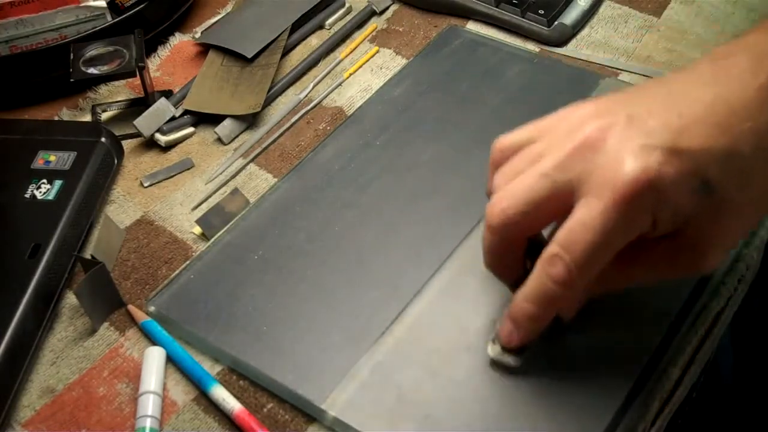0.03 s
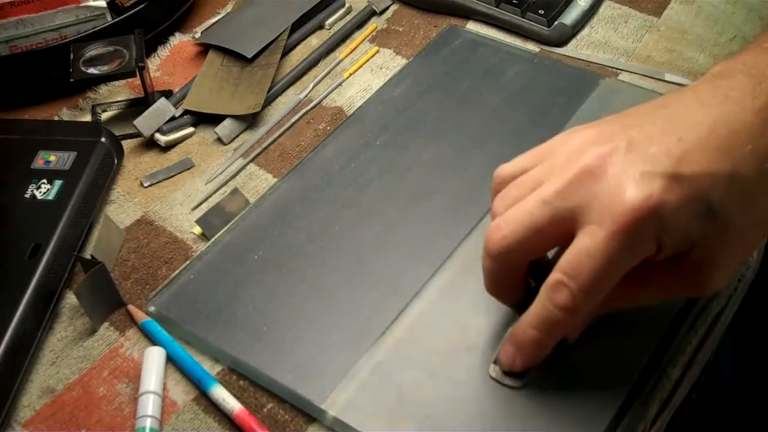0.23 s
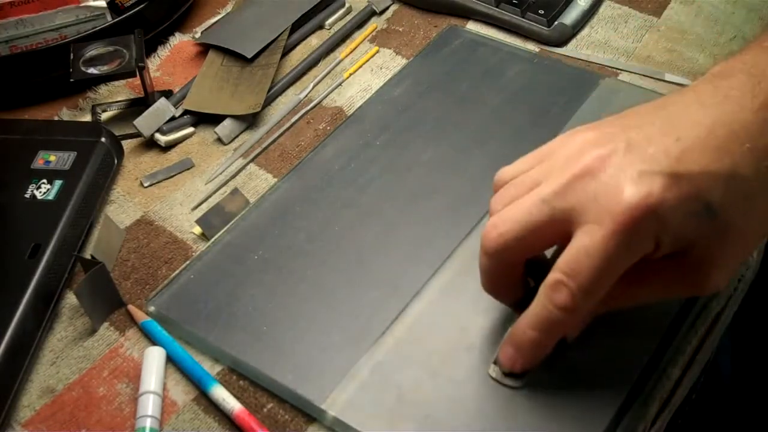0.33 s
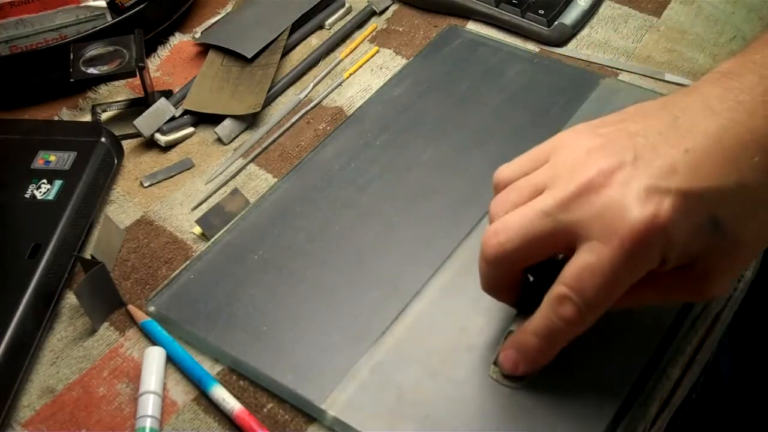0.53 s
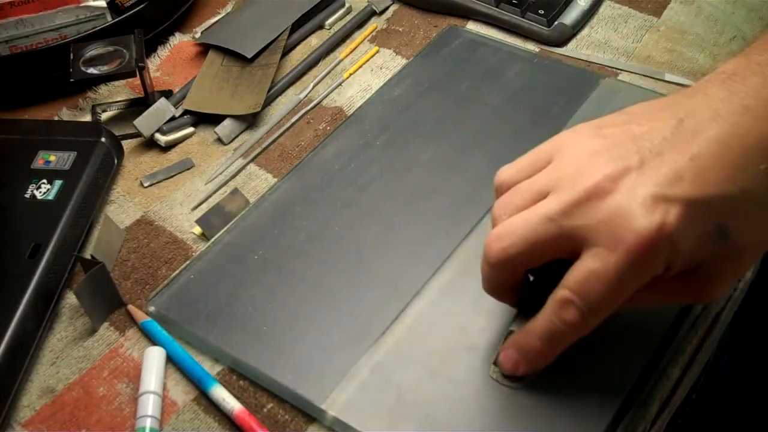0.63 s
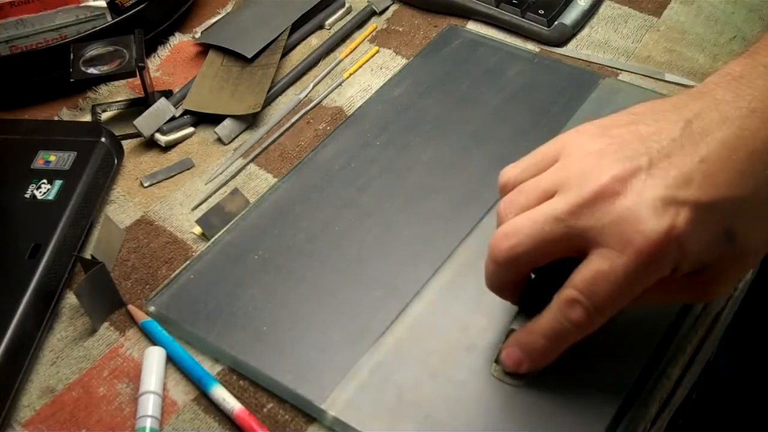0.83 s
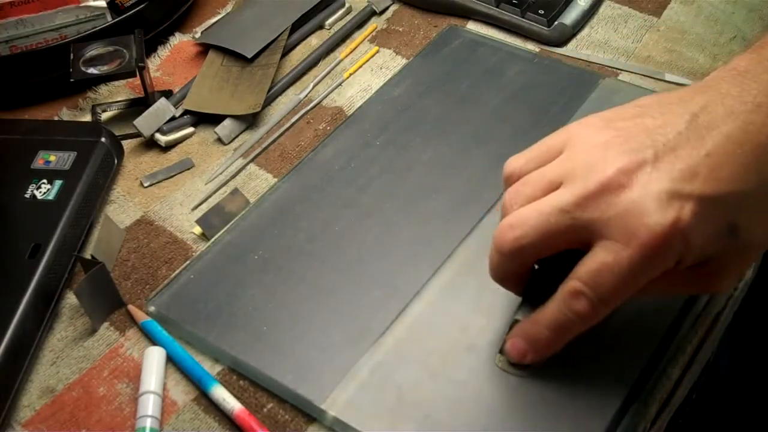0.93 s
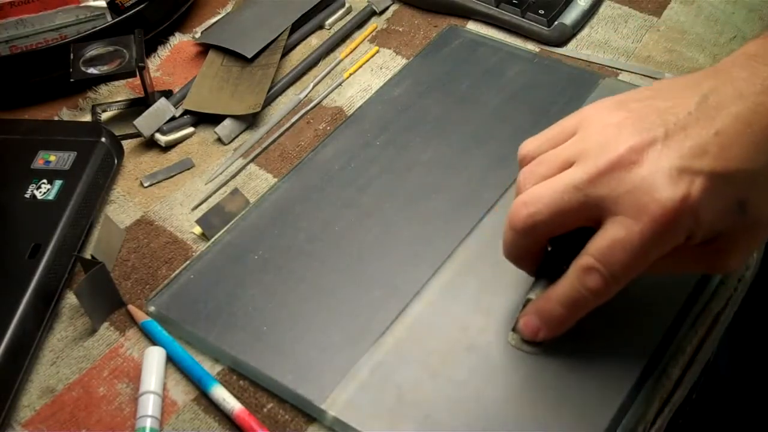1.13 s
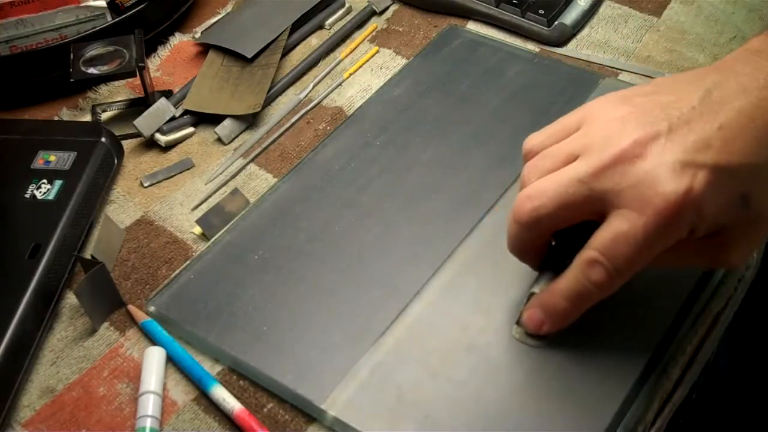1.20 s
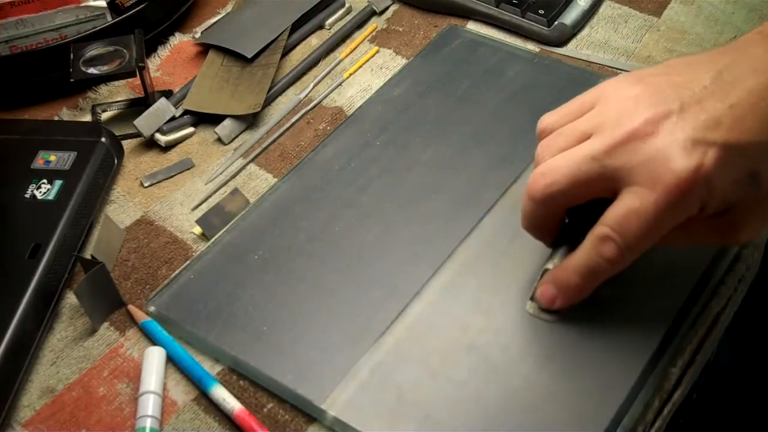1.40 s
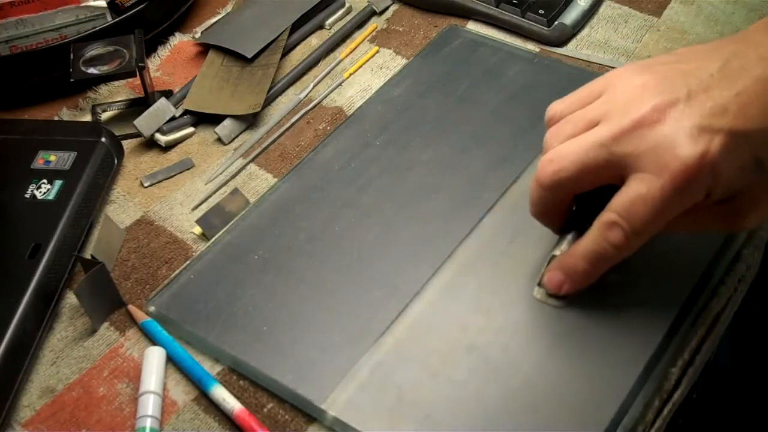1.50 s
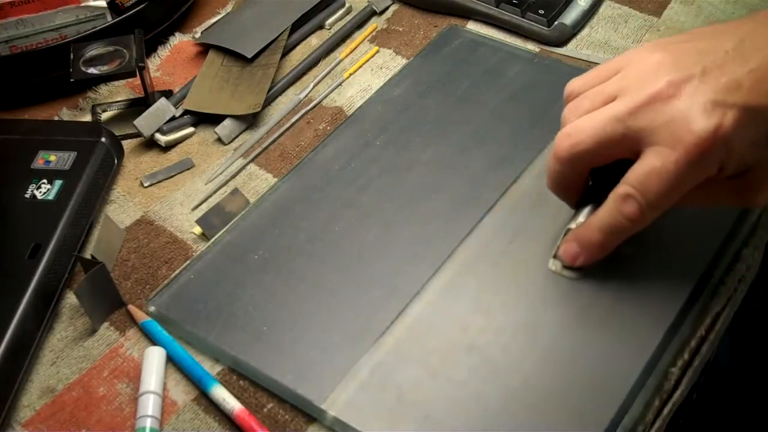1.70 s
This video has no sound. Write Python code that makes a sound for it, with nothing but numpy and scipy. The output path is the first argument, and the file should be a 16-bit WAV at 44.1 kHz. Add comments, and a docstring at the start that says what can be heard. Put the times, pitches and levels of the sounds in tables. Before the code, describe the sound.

Metal mouthpiece rubbing on sandpaper over a glass plate, after one sharp ringing click.

```python
"""A metal mouthpiece clicks down sharply on sandpaper laid over a glass plate, is nudged twice, then rubs slowly
across the grit. The click rings decaying plate and metal modes with a noise crack; the nudges are dull damped knocks.
The rub is grains and noise driving rim, plate and treble resonances. Behind it, a quiet workshop:
shaped noise for air and hiss, drifting sines for machine hum, and mains harmonics buzzing mostly on the left."""
import sys
import numpy as np
from scipy import signal
from scipy.fft import rfft, irfft, next_fast_len
from scipy.io import wavfile
from scipy.ndimage import map_coordinates

SR = 44100
rng = np.random.default_rng(int(sys.argv[2]) if len(sys.argv) > 2 else 0)


def master_out(mix):
    """Clip the mix to full scale and print it as 16-bit PCM to the path in sys.argv[1]."""
    frames = np.transpose(np.atleast_2d(mix))
    ceiling = np.clip(frames, -1, 1)
    pcm = np.round(ceiling * 32767).astype(np.int16)
    wavfile.write(sys.argv[1], SR, pcm)


def volts_from_decibels(level):
    """Turn decibel levels (scalar or array-like) into linear amplitude factors."""
    exponent = np.asarray(level, float) / 20
    return 10 ** exponent


N = 77175


def unit(x):
    """Scale to rms 1."""
    return x / np.sqrt(np.mean(x ** 2) + 1e-20)


def along(points, hz):
    """Read a curve of (f/Hz, value) points on a log frequency axis."""
    f, v = np.transpose(points)
    return np.interp(np.log(hz + 1), np.log(f + 1), v)


def sides(pan_db):
    """Left and right gains that differ by pan_db."""
    return volts_from_decibels(np.array([pan_db / 2, -pan_db / 2]))


def wobble(rate):
    """A smooth random curve with rate knots a second."""
    return map_coordinates(rng.standard_normal(int(N * rate / SR) + 4), [np.arange(N) * rate / SR])


def filtered(x, response):
    """Shape x by a complex response of frequency."""
    m = next_fast_len(N + SR // 2)
    return irfft(rfft(x, m) * response(np.fft.rfftfreq(m, 1 / SR)), m)[..., :N]


def peak(f, hz, width_hz):
    """A causal resonance of gain 1 at its centre."""
    return 1j * f * width_hz / (hz * hz - f * f + 1j * f * width_hz)


def pair(a, b, alike):
    """Left and right of a given likeness, mixed from two unrelated signals."""
    turn = np.arccos(np.clip(alike, -1, 1)) / 2
    mid, side = np.cos(turn) * a, np.sin(turn) * b
    return np.array([mid + side, mid - side])


# spectrum of the air and hiss: f/Hz, relative level/dB (density)
AIR_SPECTRUM = [(12, -45), (22, -11), (60, -12), (140, -14), (250, -11.5), (570, -12), (900, -13.5),
                (1400, -14.5), (1900, -17.5), (4000, -19), (7900, -19.5), (10000, -25.5), (14000, -23.5),
                (15000, -68)]
# stereo likeness of the air: f/Hz, left-right likeness (-1 to 1)
AIR_LIKENESS = [(60, -0.19), (180, 0.38), (540, 0.57), (1630, 0.053), (4890, -0.08), (14700, 0.01)]
# stereo balance of the air: f/Hz, left minus right level/dB
AIR_BALANCE = [(60, 3), (180, 3.3), (540, 4.7), (1630, 5.3), (4890, 2.7), (14700, 1.6)]


def room_air():
    """Room air and microphone hiss: stereo noise shaped in spectrum, likeness and balance, at rms 1."""
    m = next_fast_len(N)
    hz = np.fft.rfftfreq(m, 1 / SR)
    a, b = rfft(rng.standard_normal((2, m)))
    spectrum = pair(a, b, along(AIR_LIKENESS, hz)) * volts_from_decibels(along(AIR_SPECTRUM, hz))
    return unit(irfft(spectrum * sides(along(AIR_BALANCE, hz)), m)[:, :N])


# machine tones: f/Hz, relative level/dB
HUM_TONES = [(120, -83), (180, -70.5), (240, -74.5), (538.5, -82.5), (834.4, -86), (1349, -73.5),
             (1408, -72.5)]


def machine_hum():
    """Steady machine tones, each a sine of gently drifting level."""
    t = np.arange(N) / SR
    hum = 0
    for hz, db in HUM_TONES:
        level = volts_from_decibels(db + 4 + 0.5 * wobble(7.9))  # the whole hum sits 4 dB over its table
        hum = hum + level * np.sin(2 * np.pi * (hz * t + rng.random()))
    return hum * sides(0.99)[:, None]


# envelope over the buzz harmonics: f/Hz, relative level/dB of each harmonic
BUZZ_ENVELOPE = [(6500, -100), (7100, -79), (7600, -85), (8100, -78), (8800, -82), (9200, -100)]


def mains_buzz():
    """High mains harmonics at random phases and uneven levels, far stronger on the left."""
    mains_hz, spread_db, left_db, right_db = 60.02, 3, 3, -15
    t = np.arange(N) / SR
    lines_hz = mains_hz * np.arange(108, 154)
    levels = volts_from_decibels(along(BUZZ_ENVELOPE, lines_hz) + rng.normal(0, spread_db, len(lines_hz)))
    phases = rng.random((len(lines_hz), 1))
    buzz = levels @ np.sin(2 * np.pi * (lines_hz[:, None] * t + phases))
    return buzz * volts_from_decibels([[left_db], [right_db]])


def workshop():
    """The quiet workshop bed: air whose level drifts slowly, plus hum and buzz."""
    air, hum, buzz = room_air(), machine_hum(), mains_buzz()
    air_db = -58 + 1.24 * wobble(5.05)
    return volts_from_decibels(air_db) * air + hum + buzz


def grit():
    """Dense grains of uneven size on a bed of noise."""
    grains_per_s, spread_db, grains_over_noise_db = 3000, 1.8, -3
    hits = rng.random(N) < grains_per_s / SR
    grains = hits * rng.standard_normal(N) * volts_from_decibels(spread_db * rng.exponential(size=N))
    return unit(rng.standard_normal(N) + volts_from_decibels(grains_over_noise_db) * unit(grains))


def rubbed(modes, force, damping):
    """Grit force driven through modes, each swelling at random as the contact moves; damping widens them."""
    drift_db = 2.5
    ring = 0
    for k, (hz, t60, _, db, pan) in enumerate(modes):
        width_hz = 3 * np.log(10) / np.pi / max(t60, .005) * damping
        swell = volts_from_decibels(db + drift_db * wobble(11.64))
        mode = filtered(force, lambda f: peak(f, hz, width_hz))
        ring = ring + (-1) ** k * swell * sides(pan)[:, None] * mode  # neighbours in opposite sign
    return unit(ring)


# rim resonances, the lower band then the upper: f/Hz, width/Hz
RIM_BANDS = [
    [(5520, 260), (5690, 320)],
    [(5930, 320), (6110, 260)],
]


def rubbed_rim(a, b, levels_db):
    """Grit hisses through two broad bands of rim resonance, each on its own level curve."""
    force = pair(a, b, 0.78)
    rim = 0
    for db, band in zip(levels_db, RIM_BANDS):
        hiss = filtered(force, lambda f: sum(peak(f, hz, width) ** 2 for hz, width in band))
        rim = rim + volts_from_decibels(db) * unit(hiss)
    return rim * sides(-3)[:, None]


# glass plate modes: f/Hz, free t60/s, struck level/dB, rubbed level/dB, left minus right level/dB
PLATE_MODES = [(86, .15, -42, -43.5, 2), (282, 0.11, -38.5, -28, -3), (385.3, 0.18, -27.5, -14.5, 2.5),
               (463, 0.28, -36.5, -16.5, -0.5), (537, 0.15, -27, -35, 0), (670, 0.17, -30, -27, 1.5),
               (825, 0.05, -27, -33, -2), (993, 0.14, -34.5, -46, -35), (1170, 0.11, -23, -23.5, -1),
               (1356, 0.073, -16.5, -20, 1), (1585, 0.031, -5.5, -33, -4), (1875, 0.033, 5, -12.5, 4),
               (1937, 0.064, -30, -11, 3.5), (2354, 0.053, 1.5, -6, -0.5), (2761, 0.052, 1.5, -17, 2.5),
               (3184, 0.07, -1.5, -9.5, -5), (3500, 0.061, -7.5, -14.5, 13.5),
               (3683, 0.03, -0.5, -13.5, 2.5), (3943, 0.061, -2.5, -4, 1), (4390, 0.027, -4.5, -21, 10),
               (4720, 0.045, -5.5, -22.5, -11), (5575, 0.077, -5.5, -24, 1), (5700, 0.055, -24, -22, 3),
               (5760, 0.24, -44.5, -17.5, -52)]
# hiss of the rubbed plate: f/Hz, relative level/dB
PLATE_HISS_CURVE = [(300, -23), (700, 2), (1500, 8), (3000, 6), (5000, 2), (7000, -54)]


def rubbed_plate(b, c):
    """Grit rings the glass modes, with a shaped hiss under the ring."""
    hiss = unit(filtered(pair(c, b, 0.92), lambda f: volts_from_decibels(along(PLATE_HISS_CURVE, f))))
    return unit(rubbed(PLATE_MODES, c, 0.57) + volts_from_decibels(-6.5) * hiss)


# mouthpiece modes: f/Hz, free t60/s, struck level/dB, rubbed level/dB, left minus right level/dB
METAL_MODES = [(7180, 0.13, -17, -64, 22.5), (7400, 0.29, -20, -12, 25), (7480, 0.58, -17.5, -18, 20),
               (8000, 0.17, -16.5, -19, 2.5), (8900, 0.19, -56, -27, -38), (9100, 0.12, -61, -20, 20),
               (9900, 0.093, -67, -26.5, 36)]
# treble fizz: f/Hz, relative level/dB
FIZZ_CURVE = [(3880, -37), (6600, -4), (6930, 3), (8300, 7), (8940, -4), (9990, -6), (11200, -18),
              (13000, -11)]


def rubbed_treble(a):
    """Wide grit fizz leaning left, plus the mouthpiece's modes shortened by the hand that holds it."""
    held_damping = 9  # held metal rings this many times shorter
    fizz = unit(filtered(pair(grit(), grit(), 0.1), lambda f: volts_from_decibels(along(FIZZ_CURVE, f))))
    metal = rubbed(METAL_MODES, a, held_damping)
    return unit(fizz * sides(14.5)[:, None] + volts_from_decibels(2.5) * metal)


# rubbing levels, before judder and pan:
# t/s, lower rim level/dB, upper rim level/dB, plate level/dB, treble level/dB
RUB_LEVELS = [(0, -61, -60, -71, -60.5), (.044, -73, -87, -82, -69), (.12, -82, -95, -102, -95),
              (.215, -97, -100, -99.5, -97), (.23, -62, -57, -46, -73), (.255, -61, -69, -56, -65),
              (.285, -59, -58, -54, -69), (.31, -97, -100, -99, -95.5), (.45, -82, -82, -89, -95),
              (.475, -67.5, -61, -66.5, -79), (.51, -73, -95, -105, -93), (.9, -107.5, -97.5, -95, -97.5),
              (0.925, -90, -79, -68, -78), (0.935, -74, -68, -86, -73), (0.953, -58, -53.5, -56.5, -59.5),
              (0.977, -54, -60, -61, -62.5), (0.991, -49.5, -52, -58.5, -54),
              (1.015, -47.5, -53, -54, -49.5), (1.081, -51.5, -54, -55.5, -57.5),
              (1.095, -49, -62, -61, -54), (1.102, -69, -41, -53, -59), (1.116, -47, -46.5, -48.5, -52),
              (1.13, -43, -45.5, -52, -51), (1.148, -46.5, -57, -52, -49), (1.184, -46, -51, -52, -52),
              (1.2, -53, -50, -54, -55), (1.22, -51, -41.5, -48, -44), (1.29, -47.5, -49, -51, -52),
              (1.3, -48, -46.5, -47.5, -48), (1.315, -60, -41.5, -50, -51), (1.323, -45, -44, -47, -44),
              (1.337, -49, -40.5, -50, -50), (1.381, -47, -42.5, -50.5, -50), (1.393, -46.5, -59, -51, -50),
              (1.507, -45, -63, -52.5, -50), (1.533, -48, -50, -51, -53), (1.543, -45.5, -57, -51, -48.5),
              (1.563, -44.5, -62, -51.5, -49.5), (1.571, -47, -57, -51, -51), (1.597, -51, -48, -51.5, -51),
              (1.619, -40, -45, -52.5, -48), (1.711, -45.5, -46, -53, -50), (1.75, -48, -49, -54, -50.5)]


def rubbing():
    """Shared grit drives rim, plate and treble along their level curves, with one judder over all."""
    times, *columns = np.transpose(RUB_LEVELS)
    t = np.arange(N) / SR
    *rim_db, plate_db, treble_db = (np.interp(t, times, column) for column in columns)
    judder_db = 0.7 * (wobble(24.8) + wobble(90))
    a, b, c = grit(), grit(), grit()
    rim = rubbed_rim(a, b, rim_db)
    plate = volts_from_decibels(plate_db) * rubbed_plate(b, c)
    treble = volts_from_decibels(treble_db) * rubbed_treble(a)
    return volts_from_decibels(judder_db) * (rim + plate + treble)


# room decay: f/Hz, t60/s
ROOM_DECAY = [(300, 0.626), (2000, .25), (8000, 0.15)]
# stereo likeness of the room tail: f/Hz, left-right likeness
ROOM_LIKENESS = [(300, 0.98), (1000, 0.43), (4000, 0.13)]


def room(x):
    """Diffuse tail after a 300-sample delay: stereo noise in which each frequency dies at its own speed."""
    hz, t, z = signal.stft(rng.standard_normal((2, SR // 2)), SR, nperseg=256)
    decay = volts_from_decibels(-60 * t / along(ROOM_DECAY, hz)[:, None])
    diffuse = pair(*z, along(ROOM_LIKENESS, hz)[:, None])
    tail = signal.istft(diffuse * decay, SR, nperseg=256)[1]
    tail = tail / np.linalg.norm(tail[0])
    delayed = np.pad(x.mean(0), (300, 0))
    return signal.fftconvolve(delayed[None], tail, axes=1)[:, :N]


# contacts: t/s, relative level/dB, softness as upper edge f/Hz
CONTACTS = [(0.215, -8, 5560), (0.2653, -39, 9000)]


def blows():
    """A faint lead-in tick, then plate and metal ring; a softer contact reaches only the lower modes."""
    grip_s, grip_t60_s = 0.29, 0.013  # fingers close on the ringing metal
    lead_s, lead_db, build_s = 0.003, -28, 0.002
    crack_db, crack_t60_s = -7, 0.05
    flutter_db, phase_rough = 4.5, 1.1  # phase in radians
    out, t = np.zeros((2, N + SR)), np.arange(SR // 3) / SR
    for start, db, edge_hz in CONTACTS:
        grip_db = -60 * np.clip(t + start - grip_s, 0, None) / grip_t60_s
        ring = 0
        for modes, held_db in ((PLATE_MODES, 0), (METAL_MODES, grip_db)):
            for hz, t60, level, _, pan in modes:
                flutter = flutter_db * wobble(94.4)[:len(t)] * np.minimum(t / 0.021, 1)
                phase = 2 * np.pi * hz * t + rng.normal(0, hz / 9000, (2, 1))
                rough = phase_rough * wobble(68.5)[:len(t)] * np.minimum(t / 0.012, 1)
                reach = 1 / (1 + (hz / edge_hz) ** 4)
                decay = volts_from_decibels(level - 60 * t / t60 + held_db + flutter)
                ring = ring + decay * reach * np.sin(phase + rough) * sides(pan)[:, None]
        band_hz = [1100, np.clip(edge_hz * 0.6, 2000, 9000)]
        noise = pair(*rng.standard_normal((2, len(t))), 0.76)
        crack = signal.lfilter(*signal.butter(2, band_hz, "band", fs=SR), noise)
        crack = crack * volts_from_decibels(crack_db - 60 * t / crack_t60_s)
        build = 1 - np.exp(-(t / build_s) ** 2)
        hit = volts_from_decibels(db - 7.5) * (ring + 2 * crack) * build
        out[:, round(start * SR):][:, :len(t)] += hit
        # the lead-in reuses the crack, with the crack's own level taken out
        lead = volts_from_decibels(db + lead_db - crack_db) * crack * np.minimum(t / 0.0018, 1)
        out[:, round((start - lead_s) * SR):][:, :len(t)] += lead
    return out[:, :N]


# rocking and settling: t/s, relative level/dB, rise/s, brightness/dB per octave
NUDGE_EVENTS = [(.3026, -39, .0025, 0), (.6730, -51, .0005, 1.5)]
# held piece against the plate: f/Hz, relative level/dB, t60/s
KNOCK_MODES = [(480, -12, .06), (830, -2, .09), (1180, 0, .08), (1400, -4, .03), (1600, -3, .035),
               (1860, -2, .035), (2780, -10, .09), (3400, -7, .025), (5700, -11, .02)]


def nudges():
    """The piece rocks and settles: short dull knocks with a tick of grit, damped by the fingers."""
    tick_db, tick_t60_s = 3, 0.03
    out, t = np.zeros((2, N + SR)), np.arange(SR // 8) / SR
    for start, db, rise_s, tilt_db in NUDGE_EVENTS:
        ring = 0
        for hz, level, t60 in KNOCK_MODES:
            decay = volts_from_decibels(level + tilt_db * np.log2(hz / 1000) - 60 * t / t60)
            ring = ring + decay * np.sin(2 * np.pi * hz * t + rng.normal(0, 0.22, (2, 1)))
        noise = rng.standard_normal(len(t))
        tick = unit(signal.lfilter(*signal.butter(1, [800, 2600], "band", fs=SR), noise))
        tick = volts_from_decibels(tick_db - 60 * t / tick_t60_s) * tick
        knock = (ring + tick) * (1 - np.exp(-(t / rise_s) ** 2))
        out[:, round(start * SR):][:, :len(t)] += volts_from_decibels(db) * knock * sides(1.4)[:, None]
    return out[:, :N]


def scene():
    """Contacts, nudges and rubbing in the room, over the workshop."""
    left_lag_s, room_db = 1 / 44100, -17
    near = blows() + nudges() + rubbing()
    near = filtered(near, lambda f: np.exp(-2j * np.pi * f * [[left_lag_s], [0]]))
    return near + volts_from_decibels(room_db) * room(near) + workshop()


def top_cut(x):
    """Nothing passes above the cut-off."""
    return signal.sosfilt(signal.butter(12, 15290, fs=SR, output="sos"), x)


def record(dry):
    """Cut everything from 14280 Hz up to finish the mix."""
    mix = filtered(dry, lambda f: f < 14280)
    return top_cut(mix)


dry = scene()
out = record(dry)
master_out(out)
```